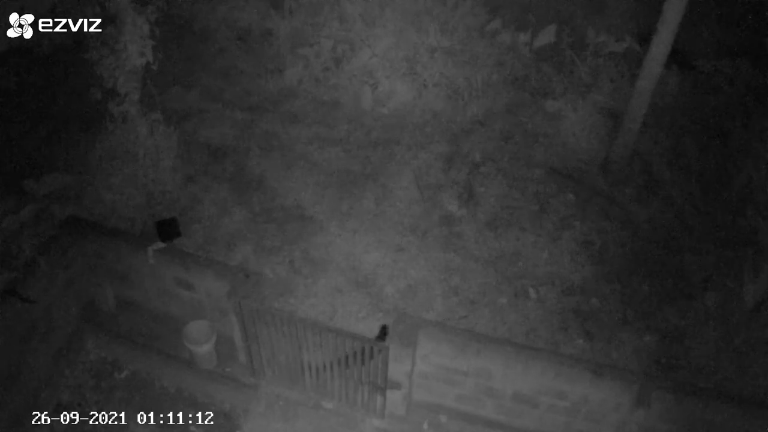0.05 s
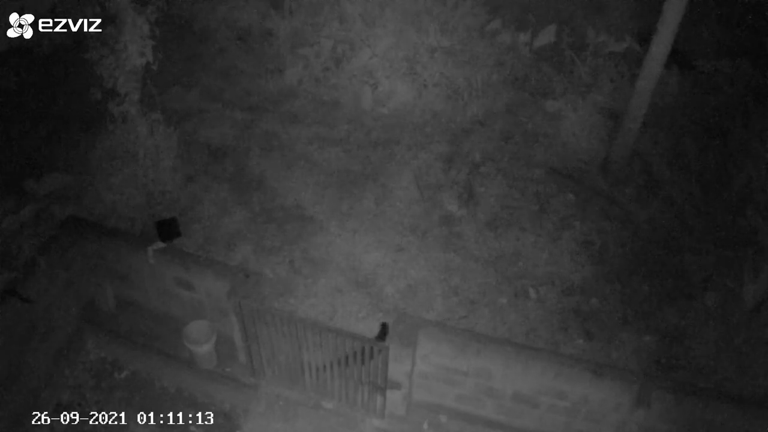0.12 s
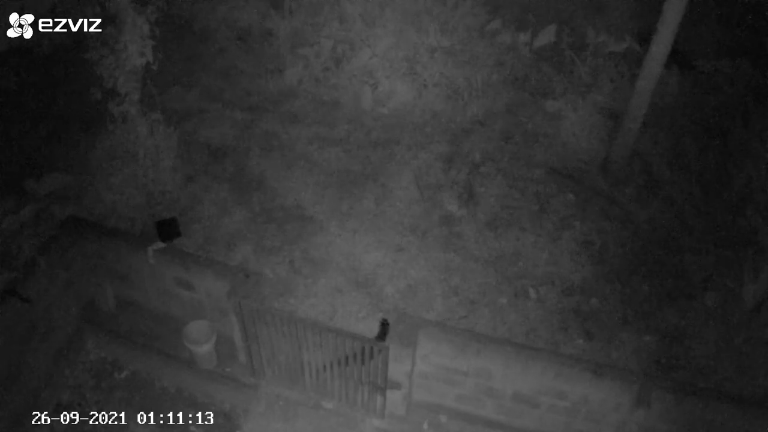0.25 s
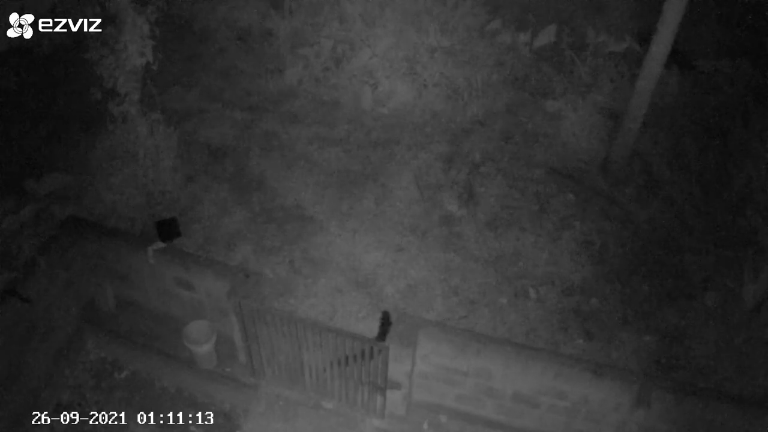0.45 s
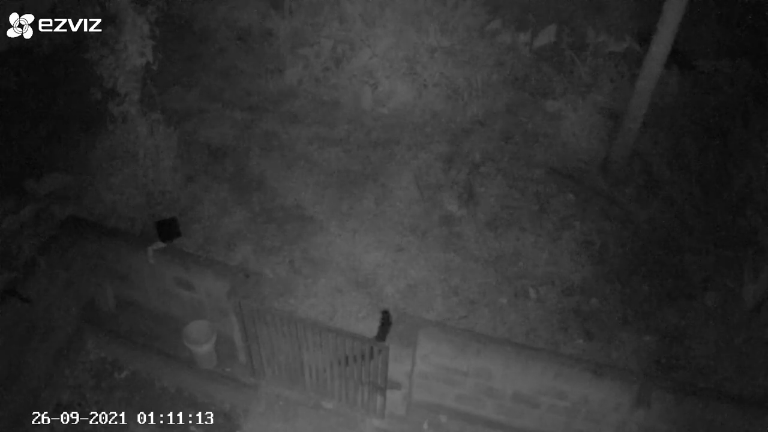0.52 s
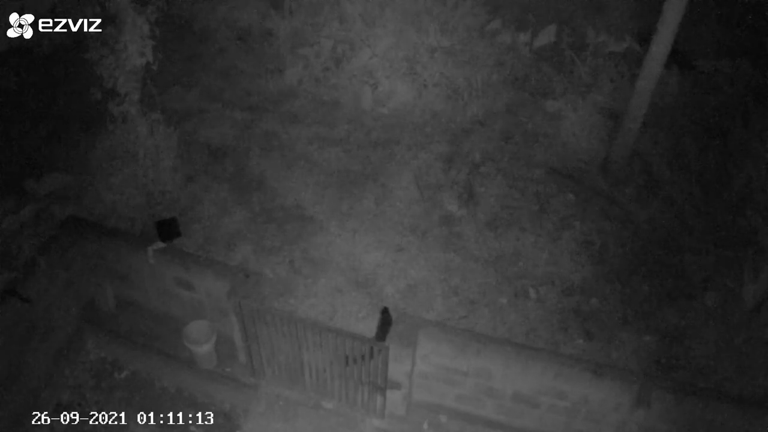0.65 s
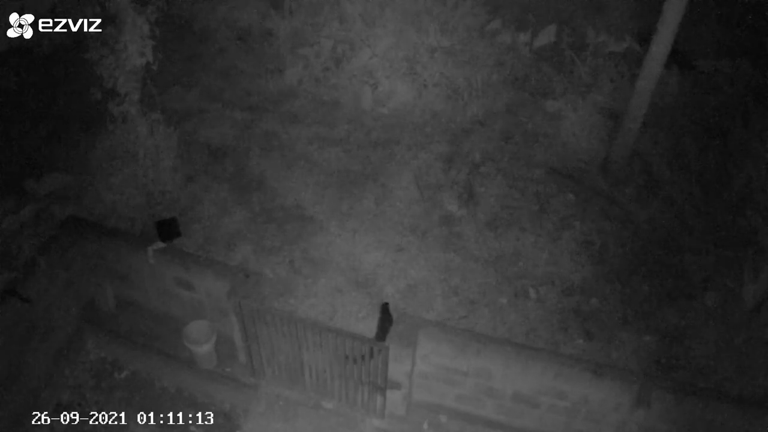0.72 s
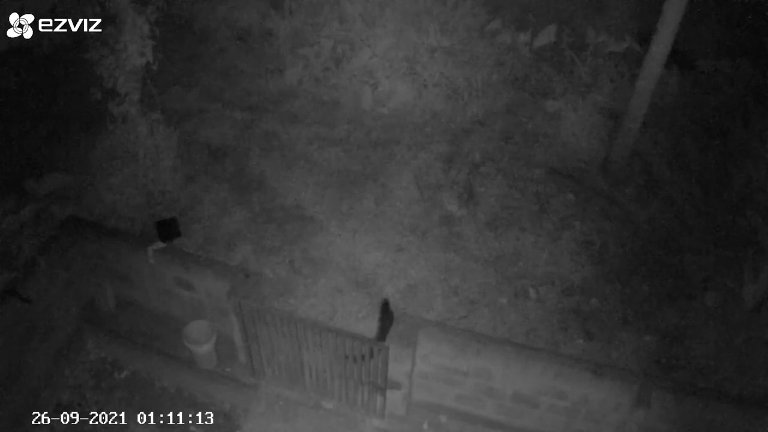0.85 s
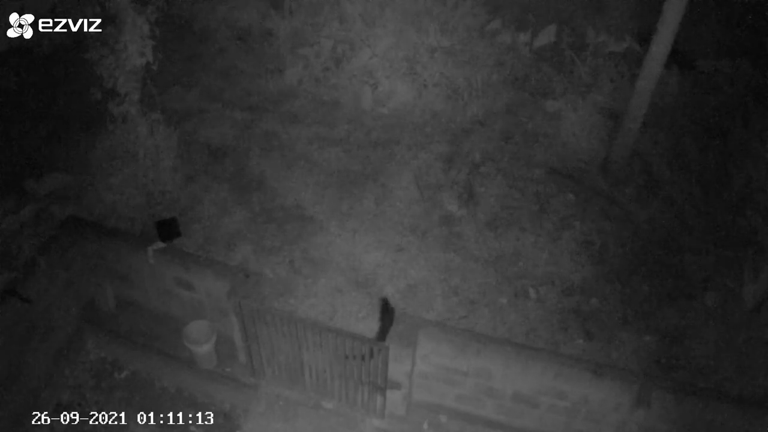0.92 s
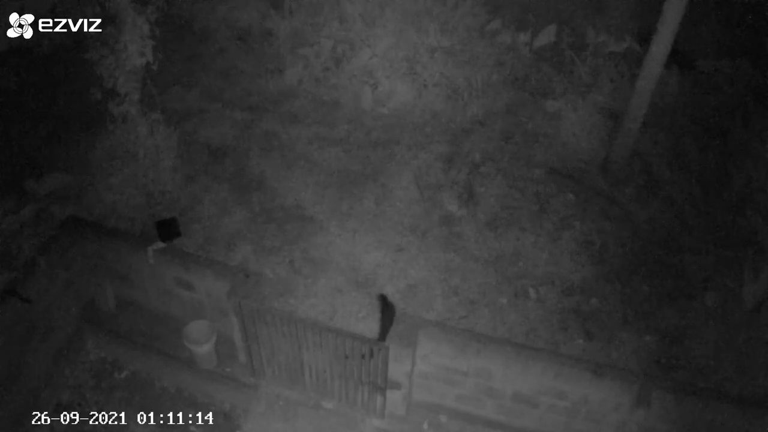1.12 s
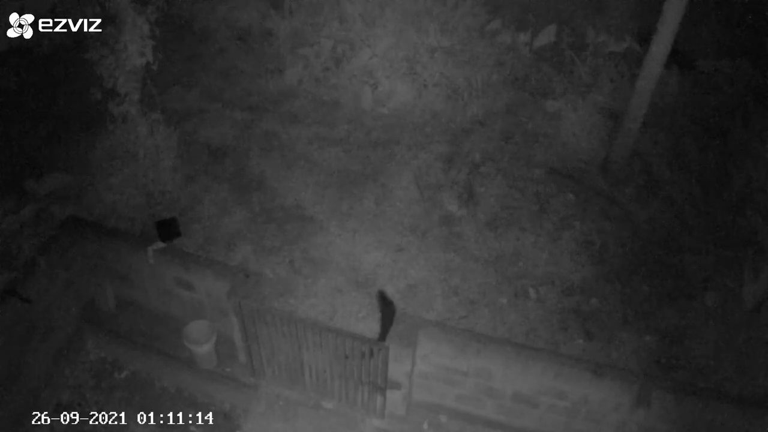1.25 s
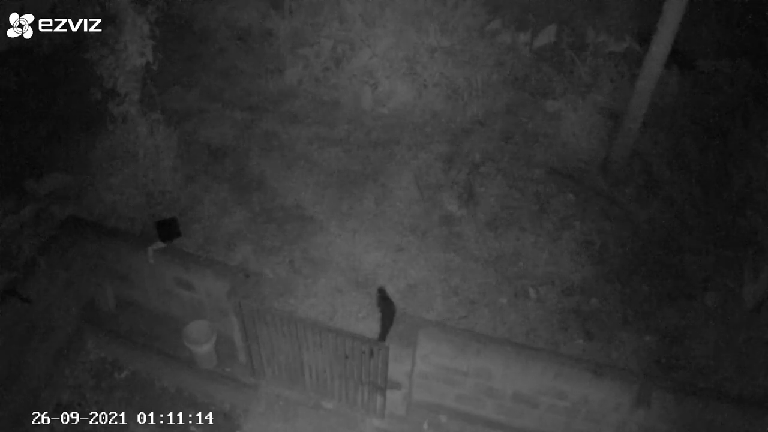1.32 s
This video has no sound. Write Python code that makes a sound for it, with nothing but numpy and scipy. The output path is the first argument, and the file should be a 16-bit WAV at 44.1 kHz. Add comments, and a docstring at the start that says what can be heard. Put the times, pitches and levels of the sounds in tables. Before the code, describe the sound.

A small frog close to the microphone gives a soft rattle, then a louder ringing one until half a second; faint crickets, distant frog chirps, hiss and low air flutter continue in the open yard.

```python
"""A yard at night. From the start a small frog close by rattles bursts of ringing clicks, soft then loud,
until about 0.5 s; a blur of small clicks and echoes surrounds them and stops at 0.75 s.
Throughout, crickets shrill in two noise bands over hiss, and air pushes the microphone one way with low flutter.
Faint low sines come and go from 0.27 s; farther frogs give short narrow calls, mostly after 0.5 s.
From 0.87 s the high crickets, far frogs and hiss dip together three times."""
import sys
import numpy as np
from scipy import signal
from scipy.fft import rfft, irfft
from scipy.io import wavfile
from scipy.ndimage import uniform_filter1d

SR = 44100
rng = np.random.default_rng(int(sys.argv[2]) if len(sys.argv) > 2 else 0)


def file_out(sig):
    """Save sig as 16-bit WAV at sys.argv[1]."""
    # one column per channel
    cols = np.atleast_2d(sig).T
    # limit, then scale
    lim = np.clip(cols, -1, 1)
    pcm = np.round(lim * 32767).astype(np.int16)
    wavfile.write(sys.argv[1], SR, pcm)


def voltage_ratio(level):
    """Linear amplitude factor for a level in decibels (scalar or array-like)."""
    return 10 ** (np.asarray(level, float) / 20)


N = 61739
T = np.arange(N) / SR


def unit(x):
    """Scales to rms 1."""
    return x / np.sqrt(np.mean(x ** 2) + 1e-20)


def curves(rows):
    """Interpolates each column after the time to one value per sample."""
    s, *cols = np.transpose(rows)
    return [np.interp(T, s, c) for c in cols]


def gate(start_s, length_s, edge_s):
    """Near one inside the span, with soft sigmoid ends."""
    outside_s = np.abs(T - start_s - length_s / 2) - length_s / 2
    return 1 / (1 + np.exp(np.clip(4 * outside_s / edge_s, -50, 50)))


def noise(spectrum, patchy_db):
    """Coloured noise of rms 1 with time-frequency patches of random gain."""
    z = signal.stft(rng.standard_normal(N + 8192), nperseg=2048)[2]
    field = uniform_filter1d(rng.standard_normal(z.shape), size=2, axis=0)
    field = uniform_filter1d(field, size=3, axis=1)
    x = signal.istft(z * voltage_ratio(patchy_db * unit(field)), nperseg=2048)[1]
    f, db = np.transpose(spectrum)
    hz = np.fft.rfftfreq(len(x), 1 / SR)
    colour_db = np.interp(np.log(hz + 1), np.log(f + 1), db)
    return unit(irfft(rfft(x) * voltage_ratio(colour_db), len(x))[:N])


def rings(s, db, hz, low_db, modes, shape):
    """Each click rings decaying modes scaled to its pitch, with scattered levels, under shape(t)."""
    scatter_db = 1
    t = np.arange(SR // 20) / SR
    chance = rng.standard_normal((len(s), len(modes)))
    wave = 0
    for k, (ratio, mode_db, t60_s) in enumerate(modes):
        level_db = db[:, None] + mode_db + scatter_db * chance[:, [k]]
        level_db = level_db + (ratio < .95) * low_db[:, None]  # low modes only
        wave = wave + voltage_ratio(level_db - 60 * t / t60_s) * np.sin(2 * np.pi * ratio * hz[:, None] * t)
    wave = wave * shape(t)
    at = np.round(s * SR).astype(int)[:, None] + np.arange(len(t))
    return np.bincount(at.ravel(), wave.ravel(), N + SR)[:N]


def scattered(per_s):
    """Uneven click times, with two normal numbers for each click."""
    count = int(per_s * N / SR)
    u = rng.standard_normal((count, 3))
    s = np.clip((np.arange(count) + .4 * u[:, 0]) / per_s, 0, N / SR)
    return s, u[:, 1], u[:, 2]


# near frog's clear clicks: (time [s], relative level [dB], pitch [Hz], hold [s], low modes' extra level [dB])
NEAR_CLICKS = [(0.0045, -23.5, 3494, 0.0049, -34), (0.019, -21.5, 3480, 0.0022, -34),
               (0.029, -22.5, 3453, 0.0043, -32), (0.037, -22.5, 3538, 0.0047, -31),
               (0.0483, -21.5, 3533, 0.0023, -33), (0.059, -32.5, 3550, 0.002, -33),
               (0.0632, -30.5, 3574, 0.002, -30.5), (0.0874, -35, 3560, 0.0014, -31),
               (0.2039, -9.5, 3314, 0.0059, -12.5), (0.2192, -8.5, 3293, 0.0033, 0.5),
               (0.233, -7.5, 3283, 0.0033, 2.5), (0.2442, -8.5, 3310, 0.0033, -6),
               (0.2529, -8.5, 3283, 0.0036, 1.5), (0.2594, -14.5, 3390, 0.0028, -3),
               (0.2668, -17.5, 3380, 0.002, 0.5), (0.27, -21.5, 3310, 0.002, -0.5),
               (0.287, -21.5, 3280, 0.007, -5), (0.3047, -24, 3300, 0.002, 2),
               (0.323, -28, 3370, 0.0018, -2), (0.3397, -29.5, 3280, 0.0022, -2),
               (0.3642, -20, 3470, 0.001, 7.5), (0.3726, -20, 3358, 0.0018, -9),
               (0.3899, -16.5, 3370, 0.001, -5.5), (0.3963, -17, 3415, 0.004, -18.5),
               (0.4208, -15, 3420, 0.0016, 2), (0.4263, -16, 3410, 0.0053, -17.5),
               (0.444, -11, 3453, 0.00082, 6), (0.4472, -17.5, 3530, 0.0035, -18.5),
               (0.452, -12.5, 3490, 0.0023, -16), (0.4574, -10, 3413, 0.00066, -6.5),
               (0.4603, -10, 3740, 0.0012, -19), (0.4634, -10, 3534, 0.0016, -15.5),
               (0.467, -13.5, 3562, 0.002, -10.5), (0.4735, -14, 3730, 0.0014, -15.5),
               (0.4771, -14.5, 3750, 0.0013, -5.5), (0.4785, -13.5, 3720, 0.0023, -20),
               (0.499, -28.5, 3800, 0.00198, -6), (0.508, -27.5, 3422, 0.0044, -8)]
# near frog's resonances: (pitch ratio [1], relative level [dB], 60 dB decay time [s])
NEAR_RING = [(0.681, -16.5, 0.007), (.79, -14, 0.021), (.88, -5.5, 0.022), (1.001, 1, 0.085),
             (1.075, -22.5, 0.026), (1.178, -26.5, 0.03)]


def clear_clicks():
    """Held rings with a snap at onset, then a drop to a weak linger."""
    s, db, hz, hold_s, low_db = np.transpose(NEAR_CLICKS)
    ring_db, linger_db, release_s = -4, -13.5, .0014
    snap, snap_s = .45, .001  # extra height of the first moment
    soft_attack_s, hard_attack_s = .0018, .0005
    # clicks with weak low modes start softly
    attack_s = np.interp(low_db, [-20, -10], [soft_attack_s, hard_attack_s])[:, None]

    def held(t):
        attack = 1 - np.exp(-(t / attack_s) ** 2)
        onset = 1 + snap * np.exp(-(t / snap_s) ** 2)
        after_hold_s = np.clip(t - hold_s[:, None], 0, 1)
        return attack * onset * (voltage_ratio(linger_db) + np.exp(-(after_hold_s / release_s) ** 2))

    return rings(s, db + ring_db, hz, low_db, NEAR_RING, held)


# blur around the clicks: (time [s], level [dB], pitch [Hz], low modes' extra level [dB])
BLUR_COURSE = [(0, -41.5, 3530, -21.5), (.1, -46.5, 3653, -15.5), (.15, -50.5, 3438, 1),
               (.2, -34.5, 3265, 9.5), (.26, -25.5, 3305, 8), (.31, -34.5, 3309, 5.5),
               (.41, -37, 3450, 5.5), (.48, -32, 3576, 7.5), (.61, -51, 3555, -5.5), (.75, -90, 3680, -10)]


def click_blur():
    """Small clicks and echoes: dense random rings on the near frog's modes."""
    per_s, pitch_spread, sizes_db, attack_s = 600, .045, 1.5, .00033
    level_db, pitch_hz, low_db = curves(BLUR_COURSE)
    s, a, b = scattered(per_s)
    hz = np.interp(s, T, pitch_hz) * (1 + pitch_spread * b)
    blur = rings(s, sizes_db * a, hz, np.interp(s, T, low_db), NEAR_RING,
                 lambda t: 1 - np.exp(-(t / attack_s) ** 2))
    return voltage_ratio(level_db) * (T < BLUR_COURSE[-1][0]) * unit(blur)


def near_frog():
    """Clear clicks and blur inside one steep band whose low edge climbs by a crossfade."""
    lo_hz, hi_hz, edge_rise = 1782, 4500, 1.113
    both = clear_clicks() + click_blur()

    def band(edge_hz):
        sos = signal.cheby2(4, 22, [edge_hz, hi_hz], "bandpass", fs=SR, output="sos")
        return signal.sosfiltfilt(sos, both)

    late = np.interp(T, [.3, .37], [0, 1])
    return (1 - late) * band(lo_hz) + late * band(edge_rise * lo_hz)


# lower crickets' loudness: (time [s], level [dB])
LOW_CRICKET_LEVEL = [(0.0, -36), (0.042, -51), (0.072, -56), (0.146, -64.5), (0.288, -43), (0.342, -63.5),
                     (0.482, -52), (0.536, -48.5), (0.634, -69.5), (0.832, -52), (0.906, -77.5),
                     (0.946, -67), (1.046, -83), (1.062, -67.5), (1.194, -82.5), (1.268, -60.5),
                     (1.284, -67), (1.4, -51.5)]
# lower crickets' colour: (frequency [Hz], relative density [dB per Hz])
LOW_CRICKET_BAND = [(2290, -58), (3900, -29), (4040, -4.5), (4130, -1.5), (4600, 4), (4790, -5.5),
                    (5100, -53), (6630, -64), (11200, -120)]


def low_crickets():
    """A narrow noise band under a moving level."""
    return voltage_ratio(curves(LOW_CRICKET_LEVEL)[0]) * noise(LOW_CRICKET_BAND, patchy_db=3)


# pushes of air: (peak time [s], height [dB], rise [s], fall [s])
AIR_PUSHES = [(0.047, -42.5, 0.037, 0.038), (0.081, -36.5, 0.0092, 0.0077), (.15, -47.5, 0.021, 0.026),
              (0.209, -32, 0.017, 0.011), (.32, -44.5, 0.057, 0.032), (.378, -38, 0.019, 0.019),
              (0.513, -37, .04, 0.027), (0.578, -45.5, 0.041, 0.011), (.635, -42.5, 0.027, 0.018),
              (0.718, -38.5, 0.028, 0.016), (0.744, -38.5, 0.012, 0.0051), (0.779, -45, 0.033, 0.022),
              (0.82, -40.5, 0.015, 0.0075), (0.848, -48, 0.0052, 0.019), (0.952, -34.5, 0.019, 0.008),
              (0.984, -54, 0.017, 0.017), (1.099, -42, 0.025, 0.017), (1.298, -39.5, 0.024, 0.027),
              (1.39, -41, 0.012, 0.011)]
# low flutter's colour: (frequency [Hz], relative density [dB per Hz])
FLUTTER_COLOUR = [(18, -37.5), (30, -3.5), (65, -15), (108, -8.5), (170, -29.5), (220, -60), (370, -120)]


def air():
    """One-way lopsided Gaussian pushes, with low noise that grows with them."""
    gain_db, still, growth = -60.5, .15, .66
    push = sum(voltage_ratio(db) * np.exp(-((T - s) / np.where(T < s, rise_s, fall_s)) ** 2)
               for s, db, rise_s, fall_s in AIR_PUSHES)
    growing = (still + push / push.mean()) ** growth
    return push + voltage_ratio(gain_db) * growing * noise(FLUTTER_COLOUR, patchy_db=1.0)


# far frogs' calls: (start [s], length [s], level before dips [dB], pitch [Hz], undertone's relative level [dB])
FAR_CALLS = [(0, 0.054, -58.5, 2740, -39), (0.519, 0.177, -55.5, 3836, -5),
             (0.804, 0.071, -56, 3420, -18.5), (0.837, 0.069, -55, 3582, -24),
             (0.986, 0.071, -57.5, 3176, -12), (1.053, 0.027, -58.5, 3230, -37.5),
             (1.073, 0.0092, -42.5, 3060, -35), (1.083, .018, -48.5, 3070, -44),
             (1.108, 0.012, -51, 3068, -44), (1.119, 0.035, -55.5, 3096, -44),
             (1.205, 0.0725, -52, 3308, -8), (1.24, 0.2, -70, 2672, -23), (1.261, 0.027, -43.5, 3347, -15),
             (1.283, 0.023, -48.5, 3330, -9.5), (1.299, 0.039, -53, 3290, -14),
             (1.355, 0.07, -49.5, 3368, -7)]


def far_frogs():
    """Each call is a steady whistle plus a quick run of soft clicks on a narrow ring and its undertone."""
    per_s, t60_s, pitch_spread, attack_s, edge_s = 350, .08, .012, .003, .0087
    modes = [(1, 0, t60_s), (.885, 0, t60_s)]
    s, a, b = scattered(per_s)
    out = np.zeros(N)
    for start_s, length_s, db, hz, low_db in FAR_CALLS:
        whistle_share = .8 if length_s < .025 else .25  # of power
        whistle = np.sqrt(2 * whistle_share) * np.sin(2 * np.pi * hz * T)
        grains = rings(s, 1.3 * a, hz * (1 + pitch_spread * b), low_db + 0 * s, modes,
                       lambda t: 1 - np.exp(-t / attack_s))
        call = whistle + np.sqrt(1 - whistle_share) * unit(grains)
        out += voltage_ratio(db) * gate(start_s, length_s, edge_s) * call
    return out


# high crickets' colour: (frequency [Hz], relative density [dB per Hz])
HIGH_CRICKET_BAND = [(3060, -51.5), (5280, -32.5), (5480, -12.5), (5730, -5), (6030, 1), (6330, -5.5),
                     (6380, -3), (6620, -15.5), (6720, -13.5), (7640, -30.5), (7850, -40.5), (8700, -48),
                     (16800, -120)]


def high_crickets():
    """A steady patchy noise band."""
    return voltage_ratio(-53.5) * noise(HIGH_CRICKET_BAND, patchy_db=5.5)


# faint low tones: (start [s], length [s], level [dB], start pitch [Hz], end pitch [Hz])
LOW_TONES = [(0.272, 0.1, -67.5, 798, 734), (0.492, 0.023, -56.5, 311.4, 300),
             (0.557, 0.018, -66.5, 330, 325), (0.629, 0.049, -64.5, 319, 316),
             (0.774, 0.036, -62.5, 313, 315), (0.799, 0.056, -69, 520, 517), (0.806, 0.05, -66, 257.7, 238),
             (1.083, 0.038, -63, 260.5, 251), (1.334, 0.04, -61.5, 308.8, 311)]


def low_tones():
    """Soft-edged sines whose pitch glides linearly."""
    out = np.zeros(N)
    for start_s, length_s, db, from_hz, to_hz in LOW_TONES:
        hz = np.interp(T, [start_s, start_s + length_s], [from_hz, to_hz])
        out += voltage_ratio(db) * gate(start_s, length_s, .0055) * np.sin(2 * np.pi * np.cumsum(hz) / SR)
    return out


# night air hiss's colour: (frequency [Hz], relative density [dB per Hz])
HISS_COLOUR = [(71, -34), (120, -2), (276, -6.5), (313, -7.5), (614, -13), (887, -18.5), (1070, -19),
               (2990, -22.5), (3750, -15.5), (5500, -33), (7150, -56.5), (12100, -120)]


def hiss():
    """Patchy noise, strongest in the lows."""
    return voltage_ratio(-65.5) * noise(HISS_COLOUR, patchy_db=5)


# background dips: (start [s], end [s], depth [dB])
BACKGROUND_DIPS = [(0.867, 0.929, -12.5), (0.987, 1.056, -14), (1.123, 1.249, -15)]


def background():
    """High crickets and far frogs dip fully, the hiss by a share of the same dB."""
    edge_s, hiss_share = .01, .72
    dip_db = sum(db * np.clip(np.minimum(T - start_s, end_s - T) / edge_s + .5, 0, 1)
                 for start_s, end_s, db in BACKGROUND_DIPS)
    return voltage_ratio(dip_db) * (high_crickets() + far_frogs()) + voltage_ratio(hiss_share * dip_db) * hiss()


def scene():
    """Sums all sources, mono."""
    return (near_frog() + low_crickets() + air() + low_tones() + background())[None]


def band_limit(x):
    """A steep low-pass at the top of the band."""
    return signal.sosfilt(signal.butter(12, 8900, fs=SR, output="sos"), x)


def record(dry):
    """Returns the finished mix as recorded."""
    return band_limit(dry)


dry = scene()
out = record(dry)
file_out(out)
```